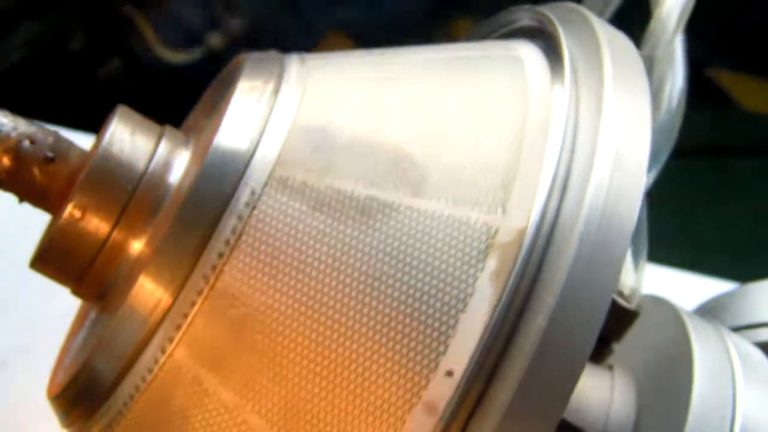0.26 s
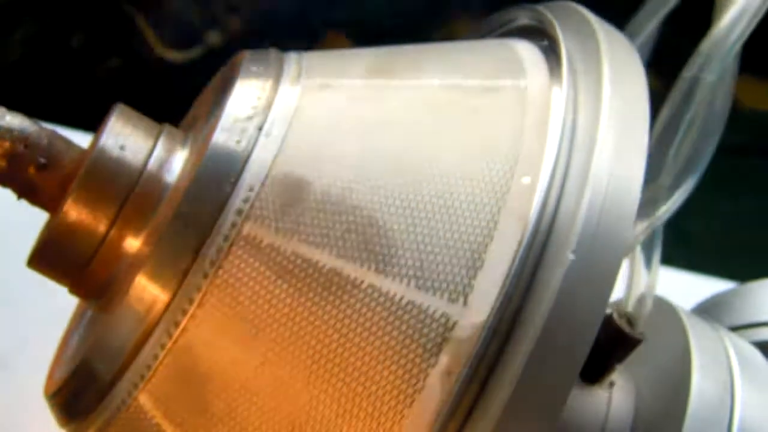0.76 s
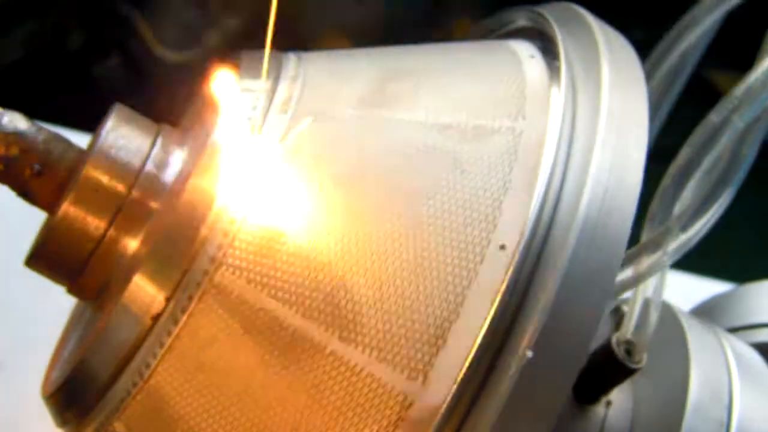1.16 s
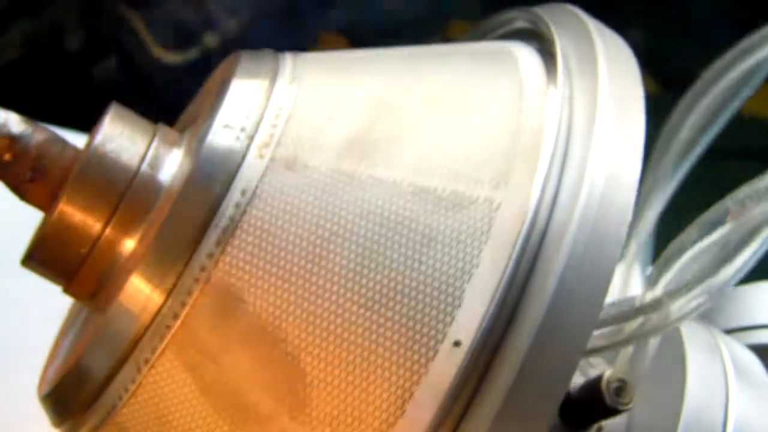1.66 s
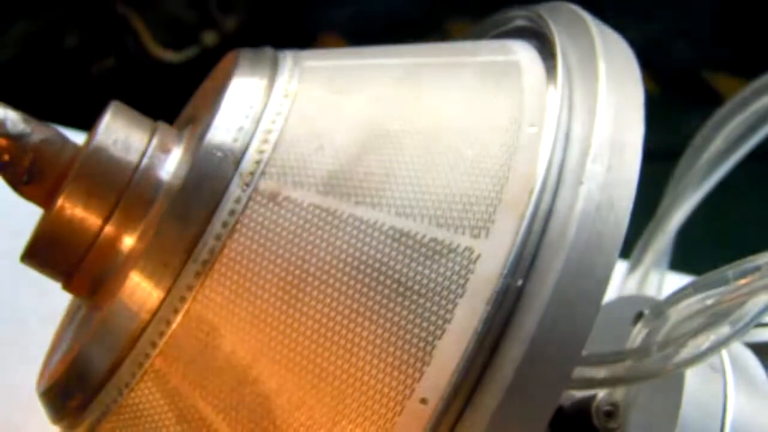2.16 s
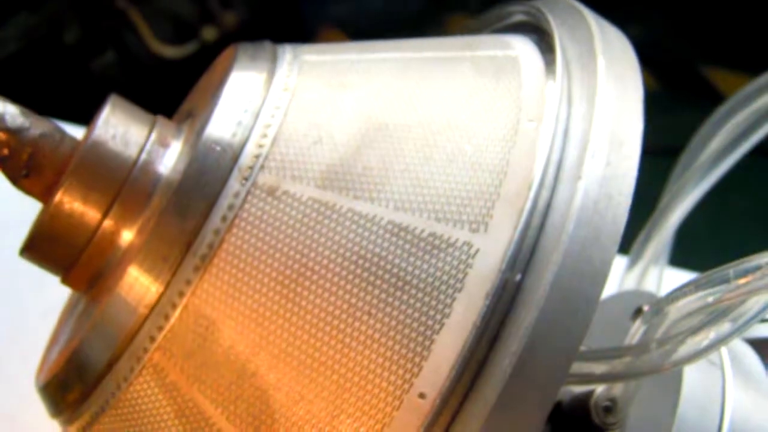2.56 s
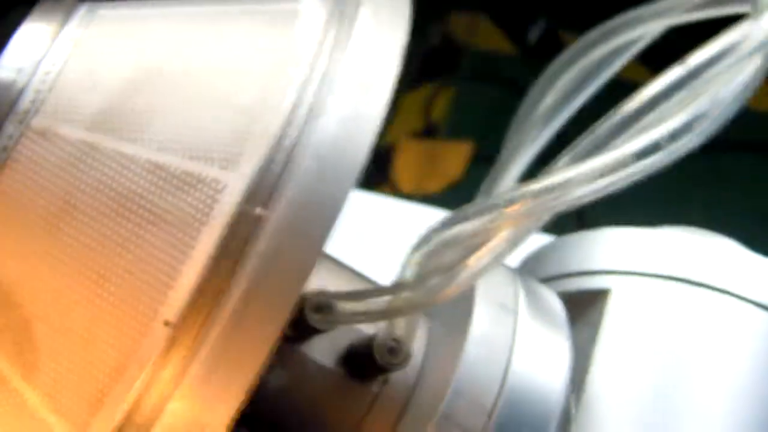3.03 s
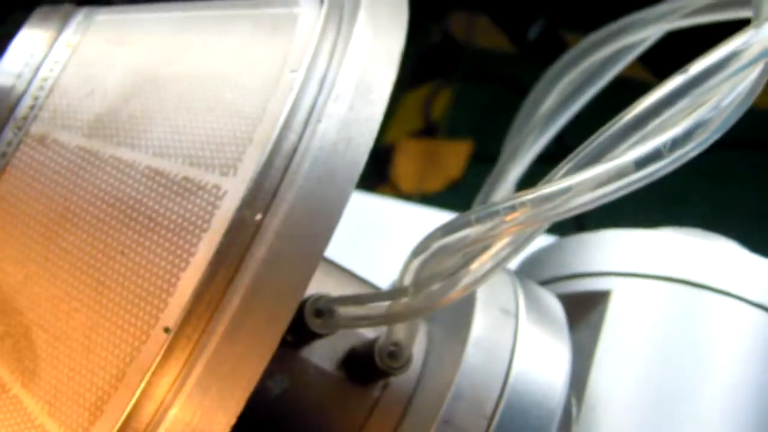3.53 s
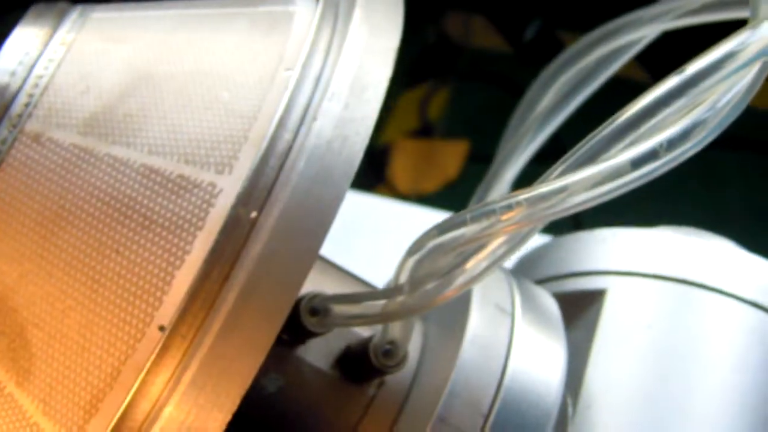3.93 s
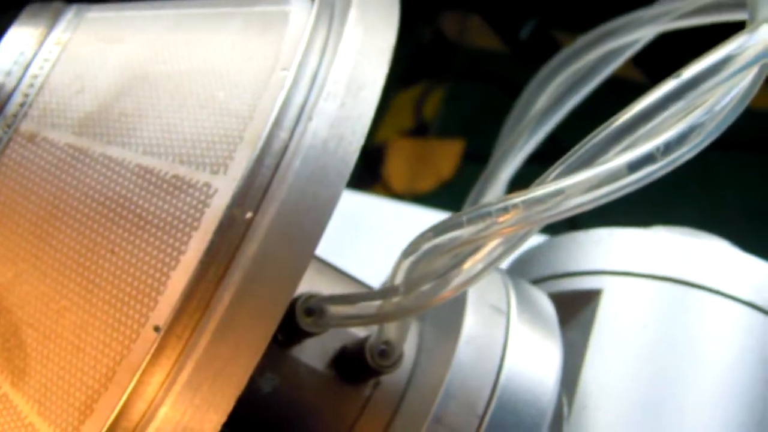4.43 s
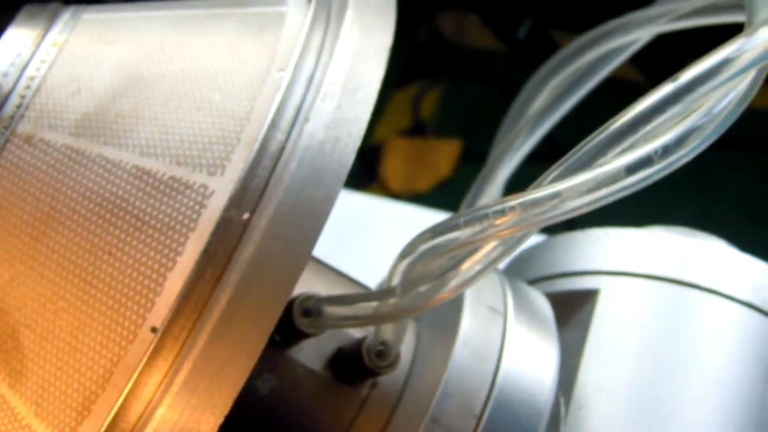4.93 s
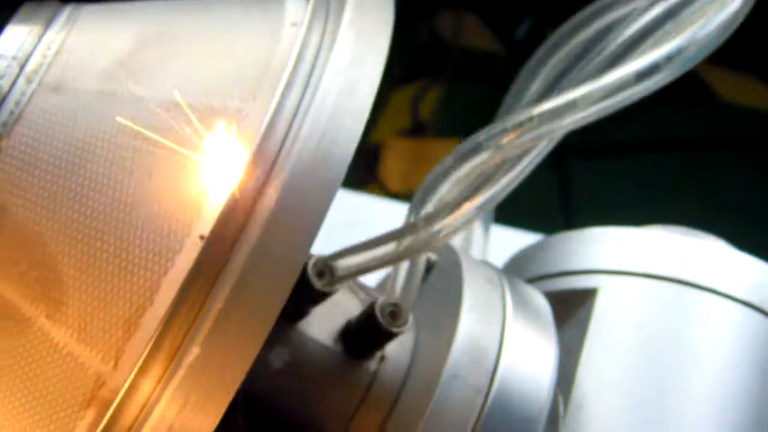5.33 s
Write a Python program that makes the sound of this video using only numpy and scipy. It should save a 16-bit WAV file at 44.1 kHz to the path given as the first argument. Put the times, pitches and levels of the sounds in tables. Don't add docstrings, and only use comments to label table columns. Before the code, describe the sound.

A welding laser fires sharp, even metallic snaps about nine a second, pauses over fan hum and hissing gas, then restarts with three louder cracks.

```python
import sys
import numpy as np
from scipy import signal
from scipy.fft import rfft, irfft, next_fast_len
from scipy.io import wavfile
from scipy.ndimage import map_coordinates

SR = 44100
rng = np.random.default_rng(int(sys.argv[2]) if len(sys.argv) > 2 else 0)


def dump(signal):
    limited = np.clip(np.atleast_2d(signal).T, -1, 1)
    pcm = np.round(limited * 32767).astype(np.int16)
    wavfile.write(sys.argv[1], SR, pcm)


def field_ratio(decibels):
    return 10 ** (np.asarray(decibels, dtype=float) / 20)


N = 246519

# (frequency [Hz], level [dB per Hz])
ECHO_SPECTRUM = [(880, -41), (1500, -6.5), (2010, -10), (2550, -7.5), (4580, -2.5), (4810, -7.5),
                 (8030, -1.5), (10000, -7.5), (10500, -35), (13600, -55), (22000, -120)]

DUCKED_DB = -29


def unit(x):
    return x / np.sqrt(np.mean(x ** 2) + 1e-20)


def along(points, hz):
    f, v = np.transpose(points)
    return np.interp(np.log(hz + 1), np.log(f + 1), v)


def over_time(points, t):
    return np.interp(t, *np.transpose(points))


def wobble(rate_hz):
    knots = rng.standard_normal(int(N * rate_hz / SR) + 4)
    return map_coordinates(knots, [np.arange(N) * rate_hz / SR])


def filtered(x, response):
    size = next_fast_len(len(x) + 8192)
    return irfft(rfft(x, size) * response(np.fft.rfftfreq(size, 1 / SR)), size)[:len(x)]


def noise(size, spectrum):
    return unit(filtered(rng.standard_normal(size), lambda hz: field_ratio(along(spectrum, hz))))


def resonant(x, modes):
    def response(f):
        total = 0
        for k, (hz, width_hz, db) in enumerate(modes):
            damping = 1j * f * width_hz
            total = total + (-1) ** k * field_ratio(db) * damping / (hz * hz - f * f + damping)
        return total
    return unit(filtered(x, response))


def resonant_noise(size, modes):
    return resonant(rng.standard_normal(size), modes)


def add(track, start_s, sound):
    part = track[round(start_s * SR):][:len(sound)]
    part += sound[:len(part)]


def gate(t, start, stop, rise, fall):
    return np.clip((t - start) / rise, 0, 1) ** 2 * np.exp(-np.clip(t - stop, 0, None) / fall)


def tone(db, phase, sway_db, drift_rad):
    level = field_ratio(db + 3 + sway_db * wobble(7))
    return level * np.sin(phase + drift_rad * wobble(9) + 7 * rng.random())


def camera_gain(t):
    release_s, creep_s, ease_s = 2.237, .75, 0.068
    since = np.clip(t - release_s, 0, None)
    creep = 1 - np.exp(-since ** 2 / (since + ease_s) / creep_s)
    reduck_db = -13 * np.clip(t - 5.22, 0, None)
    gain_db = 20 * np.log10(field_ratio(DUCKED_DB) + creep) + reduck_db
    dip_db = -0.5 * np.exp(-((t - 2.18) / .05) ** 2)
    return gain_db, dip_db


def rumble(gain_db):
    # (frequency [Hz], level [dB per Hz])
    spectrum = [(15, -2.5), (40, 1), (90, -8), (200, -13.5), (400, -63.5)]
    range_db = 11
    level_db = -46 + range_db * (np.tanh((gain_db - DUCKED_DB) / 14) - 1)
    return field_ratio(level_db + 4.5 + 1.1 * wobble(3.97)) * noise(N, spectrum)


def fan(t, gain_db, dip_db):
    # (multiple of blade rate, level [dB], change while welding [dB])
    blade_tones = [(1, -39.5, -2), (2, -43, -1), (2.5, -43, -4), (3, -36.5, -9), (4, -46.5, -3),
                   (5, -30.5, -1), (8, -50, -2)]
    # (time [s], frequency [Hz])
    fifth_tone = [(0, 1397), (2.05, 1397), (2.45, 1405), (5.3, 1405), (5.59, 1400)]
    # (time [s], load [0-1])
    welding = [(0, 1), (2.15, 1), (2.35, 0), (5.3, 0), (5.4, 1)]
    # (frequency [Hz], level [dB])
    motor_hums = [(200, -43.5), (260, -42), (360, -49), (585, -48), (608, -47), (796, -48), (990, -50),
                  (1044, -47), (1090, -48), (1453, -51), (2202, -53)]
    # (frequency [Hz], level [dB per Hz])
    air_spectrum = [(53, -46.5), (90, -11), (228, -6.5), (281, 0.5), (417, -9.5), (843, -6.5),
                    (1290, -10.5), (1400, -6.5), (1500, -11), (2600, -26), (3380, -38), (5720, -120)]
    turn = 2 * np.pi * np.cumsum(over_time(fifth_tone, t)) / (5 * SR)
    load = over_time(welding, t)
    blades = sum(tone(db + load * loaded_db, k * turn, sway_db=1 + 2 / k ** 2, drift_rad=0.28 + 1.6 / k ** 2)
                 for k, db, loaded_db in blade_tones)
    hums = sum(tone(db, 2 * np.pi * hz * t, sway_db=2.5, drift_rad=1.3) for hz, db in motor_hums)
    air = field_ratio(-28 + 0.21 * wobble(5.38)) * noise(N, air_spectrum)
    return field_ratio(-22.5 + gain_db + dip_db + 25) * (blades + hums + air)


def turntable(t):
    # (time [s], level [dB])
    level = [(0, -72), (.9, -66), (1.3, -62), (2.05, -61), (2.15, -80)]
    return tone(over_time(level, t), 2 * np.pi * 801 * t, sway_db=1.5, drift_rad=.4)


def gas_hiss(t, gain_db, dip_db):
    # (frequency [Hz], level [dB per Hz])
    hiss_spectrum = [(1180, -8), (2000, -1.5), (2510, -4), (3340, 0.5), (4470, -2), (4860, -2.5),
                     (6920, -5.5), (7740, -3.5), (8950, -4), (9800, -7.5), (10500, -16), (13600, -56.5),
                     (22000, -120)]
    # (frequency [Hz], width [Hz], level [dB])
    hose_modes = [(3550, 160, 0), (4430, 80, -2), (5480, 80, -1.5), (6560, 150, -5), (7530, 150, -4),
                  (8600, 100, -4)]
    # (time [s], level over the hiss [dB])
    hose_flow = [(2.25, -14), (2.4, -4), (3, -4), (3.75, -4), (3.9, -30)]
    hiss_db = -28 + 0.86 * gain_db + 1.9 * dip_db
    hose = field_ratio(over_time(hose_flow, t) + 2.7 * wobble(3.35)) * resonant_noise(N, hose_modes)
    return field_ratio(hiss_db + 0.45 * wobble(12)) * (noise(N, hiss_spectrum) + hose)


def ticks():
    # (time [s], peak [dB], frequency [Hz], width [Hz], contact [s])
    events = [
        (2.088, -42, 5540, 1200, .001),
        (2.096, -44, 7500, 2000, .001),
        (2.837, -27, 9200, 500, .006),
        (3.09, -20, 8000, 900, .001),
        (3.74, -29, 5484, 2500, 0.04),
        (3.933, -19.5, 9180, 350, 0.0032),
        (3.945, -30, 7800, 300, .004),
        (4.464, -23.5, 5840, 5000, .012),
        (5.012, -24, 9160, 700, .004),
    ]
    out, t = np.zeros(N), np.arange(SR // 4) / SR
    for start_s, db, hz, width_hz, contact_s in events:
        t60_s = 55 / width_hz + 9 * contact_s
        ring = resonant_noise(len(t), [(hz, width_hz, 0)])
        touch = resonant_noise(len(t), [(hz, 3000, 0)])
        rise_s = contact_s / 2 + 1 / SR
        ring_shape = gate(t, 0, contact_s, rise_s, t60_s / np.log(1000))
        touch_shape = gate(t, 0, contact_s, rise_s, .003)
        add(out, start_s, field_ratio(db - 1.5) * (ring_shape * ring + 0.77 * touch_shape * touch))
    return out


def valve():
    # (time [s], click [dB], click [Hz], thump [dB], body [dB])
    strokes = [
        (2.108, -31, 6650, -28, -25),
        (5.136, -14, 5670, -36, 6),
    ]
    # (frequency [Hz], level [dB per Hz])
    puff_spectra = [
        [(180, -40), (300, -9), (711, -8), (902, -31), (1110, -9.5), (2300, -17.5), (3990, -6), (4500, -11.5), (8150, -3.5), (9460, -5.5), (10500, -22), (13600, -53), (22000, -120)],
        [(880, -45), (1500, -14), (1710, -8.5), (2440, -25), (3560, -13.5), (4610, -24), (5940, -11), (7460, -17), (8570, -7), (10000, -6.5), (10500, -16), (13600, -50), (22000, -120)],
    ]
    # (frequency [Hz], width [Hz], level [dB])
    body_modes = [(1650, 200, -16), (3630, 400, -13.5), (8360, 350, 4), (10000, 300, -6.5)]
    out, t = np.zeros(N), np.arange(SR // 3) / SR
    for (start_s, click_db, click_hz, thump_db, body_db), spectrum in zip(strokes, puff_spectra):
        gas = noise(len(t), spectrum) + field_ratio(body_db) * resonant_noise(len(t), body_modes)
        grit = field_ratio(.9 * wobble(200)[:len(t)])
        snap = noise(len(t), spectrum) + resonant_noise(len(t), [(click_hz, 1000, 0)])
        click = field_ratio(click_db) * gate(t, 0, 0.0035, .0004, 0.0052) * snap
        flow = gate(t, 0.0016, 0.028, 0.011, 0.0097) + 0.35 * gate(t, .015, 0.03, 0.018, 0.077)
        puff = field_ratio(click_db - 3) * flow * grit * gas
        rebound = 0.19 * gate(t, 0.0054, .009, 0.0018, .004)
        thump = field_ratio(thump_db) * (gate(t, 0.0051, 0.006, 0.00086, .0008) - rebound)
        add(out, start_s, click + puff - thump)
    return out


def ringing(t, modes, rise_s, t60_s, scatter_db):
    now = []
    for hz, width_hz, db in modes:
        strength, detune = rng.standard_normal(2)
        now.append((hz * (1 + 0.0026 * detune), width_hz, db + scatter_db * strength))
    return gate(t, 0, 0.0048, rise_s, t60_s / np.log(1000)) * resonant_noise(len(t), now)


def vapour_jet(t, modes):
    sputter = rng.standard_normal(len(t)) * rng.exponential(size=len(t)) ** 0.49
    return resonant(sputter, sorted(modes))


def over_pulse(x):
    return x / np.sqrt(np.mean(x[:SR // 125] ** 2))


def room_echo(t, spectrum):
    # (delay [s], level [dB], spread [s])
    walls = [
        (.009, -25.5, 0.0058),
        (.028, -49, .008),
        (.062, -40, 0.011),
    ]
    # (frequency [Hz], t60 [s])
    hall_t60 = [(300, .25), (3000, 0.65), (10000, 0.72)]
    power = sum(field_ratio(2 * db) * gate(t, delay_s - .003, delay_s, 0.0043, spread_s)
                for delay_s, db, spread_s in walls)
    early = np.sqrt(power) * noise(len(t), spectrum)
    hz, frame_s, z = signal.stft(noise(len(t), spectrum), SR, nperseg=256)
    decay = field_ratio(-60 * frame_s / along(hall_t60, hz)[:, None])
    hall = signal.istft(z * decay, SR, nperseg=256)[1][:len(t)]
    return early + field_ratio(-40.5) * gate(t, 0.0043, 1, 0.0066, 1) * hall


def flash(db, low_hz, high_hz, knock_db, echo_spectrum, echo_db):
    # (frequency [Hz], width [Hz], level [dB])
    slow_modes = [(3097, 425, 15.5), (2450, 890, -5), (4170, 700, -23)]
    # (frequency [Hz], width [Hz], level [dB])
    fast_modes = [(6270, 810, -0.5), (8305, 440, -0.5), (9920, 850, -10)]
    t = np.arange(SR // 2) / SR
    snap = field_ratio(-8) * np.exp(-t / 0.00025) * np.sin(2 * np.pi * 7500 * t) * (t < .003)
    lead = field_ratio(-17.5) * gate(t, 0, 0.0038, 0.00058, 0.0027) * noise(len(t), ECHO_SPECTRUM)
    fast = vapour_jet(t, fast_modes + [(high_hz, 300, 4)])
    high = field_ratio(-12) * over_pulse(gate(t, 0.00074, 0.0064, 0.002, 0.0012) * fast)
    slow = vapour_jet(t, slow_modes + [(low_hz, 250, 14)])
    low = field_ratio(-19 - db) * over_pulse(gate(t, .0015, .0071, 0.0025, 0.00067) * slow)
    push_noise = noise(len(t), [(600, -26), (1100, -6), (2100, 6), (2800, -5)])
    push = field_ratio(knock_db / 2 - 17) * over_pulse(gate(t, 0, .0072, .007, 0.00035) * push_noise)
    knock_noise = noise(len(t), [(60, -25), (200, 0.5), (900, -2), (1500, -17.5)])
    knock = field_ratio(knock_db - 1) * over_pulse(gate(t, 0, .0072, .007, 0.00085) * knock_noise)
    echo = field_ratio(echo_db) * room_echo(t, echo_spectrum)
    return field_ratio(db) * (snap + lead + high + low + push + knock + echo)


def laser():
    # (peak [dB], low whistle [Hz], high whistle [Hz], knock [dB])
    first_seam = [(-1.5, 3850, 7820, -48), (-2.5, 2500, 8870, -33), (-2, 3070, 6630, -37),
                  (-4.5, 3000, 6900, -39.5), (-2.5, 3190, 3800, -29.5), (-3, 3150, 5980, -41),
                  (-2.5, 3800, 6670, -35.5), (-3.5, 2820, 8720, -30.5), (-3.5, 3400, 7830, -33),
                  (-1.5, 2500, 5820, -36.5), (-4, 2730, 7100, -33.5), (-3.5, 2700, 7650, -34.5),
                  (-4.5, 2900, 8550, -45), (-5.5, 3440, 6030, -39), (-1, 2930, 6300, -37.5),
                  (-3, 3030, 6800, -46), (-3, 3100, 5970, -37), (-3, 3250, 9000, -38),
                  (-2.5, 3600, 7500, -32.5)]
    # (peak [dB], low whistle [Hz], high whistle [Hz], knock [dB])
    second_seam = [
        (4.3, 3450, 8070, -23.5),
        (2.7, 2950, 7130, -16),
        (3.4, 3360, 8300, -25),
    ]
    # (frequency [Hz], width [Hz], level [dB])
    cone_modes = [(2500, 90, -3), (3190, 110, 0), (3790, 98, -3), (4480, 80, 1), (5460, 130, 0),
                  (6160, 120, 0), (6700, 100, -6), (7200, 90, -8), (7650, 120, -3), (8000, 100, -3),
                  (8550, 80, -1), (8940, 140, -6.5), (9710, 100, -6)]
    # (frequency [Hz], width [Hz], level [dB])
    rim_modes = [(3380, 200, -14), (4580, 180, -11), (5530, 120, -6), (6270, 150, -7.5), (6970, 140, -12),
                 (7230, 150, -11), (8130, 110, -9), (8580, 150, -5), (9320, 160, -2)]
    # (frequency [Hz], level [dB per Hz])
    rim_echo = [(1060, -51), (1800, -6), (2870, -16), (4400, -0.5), (5090, 1.5), (5400, 2), (6840, -2),
                (7420, 6), (9610, 3), (10500, -11), (13600, -67), (22000, -120)]
    pulse_s = .10756
    out, t = np.zeros(N), np.arange(SR // 4) / SR
    for k, (db, low_hz, high_hz, knock_db) in enumerate(first_seam):
        start_s = .0856 + k * pulse_s
        modes = sorted(cone_modes + [(low_hz, 120, -2)])
        add(out, start_s - .002, flash(db, low_hz, high_hz, knock_db, ECHO_SPECTRUM, echo_db=-8))
        add(out, start_s, field_ratio(db - 35.5) * ringing(t, modes, rise_s=0.0045, t60_s=.17, scatter_db=3.5))
    for k, (db, low_hz, high_hz, knock_db) in enumerate(second_seam):
        start_s = 5.3433 + k * pulse_s
        modes = sorted(rim_modes + [(high_hz, 120, 5)])
        add(out, start_s, flash(db, low_hz, high_hz, knock_db, rim_echo, echo_db=18))
        add(out, start_s, field_ratio(db - 8) * ringing(t, modes, rise_s=.0005, t60_s=.16, scatter_db=1.5))
    return out


def scene():
    t = np.arange(N) / SR
    gain_db, dip_db = camera_gain(t)
    workshop = rumble(gain_db) + fan(t, gain_db, dip_db) + turntable(t) + gas_hiss(t, gain_db, dip_db)
    return (workshop + ticks() + valve() + laser())[None]


def top_cut(x):
    return signal.sosfilt(signal.butter(12, 10820, fs=SR, output="sos"), x)


def record(dry):
    # (frequency [Hz], level [dB])
    band_edge = [(9800, -0.5), (10300, -12.5), (10900, -39.5), (11800, -66), (13000, -100)]
    saturated = dry[0] / (1 + np.abs(dry[0] / 0.77) ** 6) ** (1 / 6)
    narrow = filtered(saturated, lambda hz: field_ratio(along(band_edge, hz)))
    return top_cut(np.clip(1.032 * narrow, -1, 1)[None])


dry = scene()
out = record(dry)
dump(out)
```